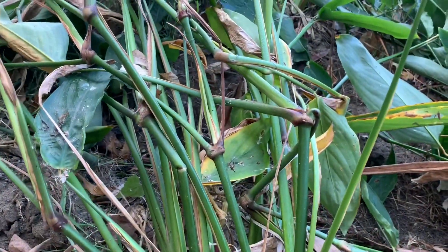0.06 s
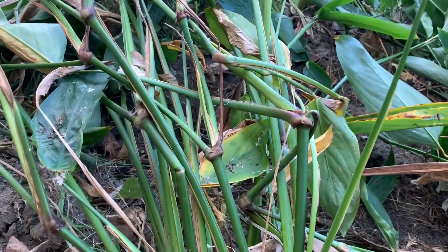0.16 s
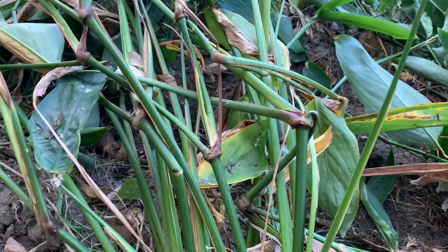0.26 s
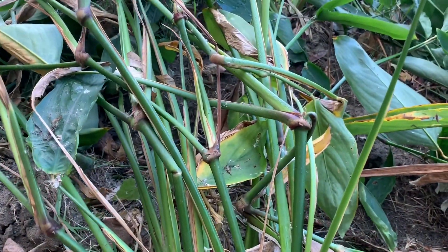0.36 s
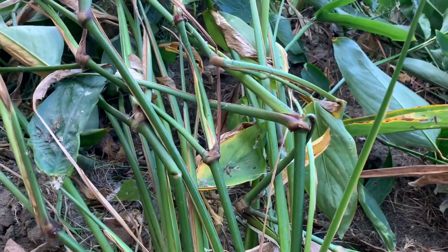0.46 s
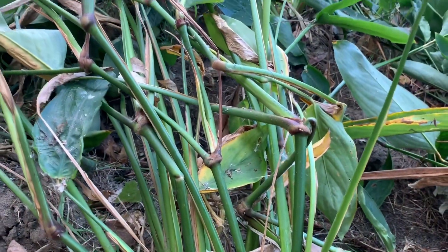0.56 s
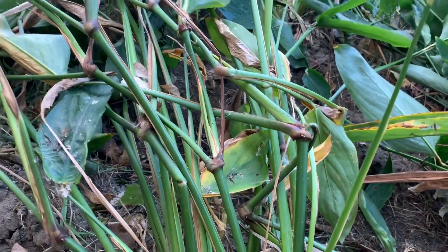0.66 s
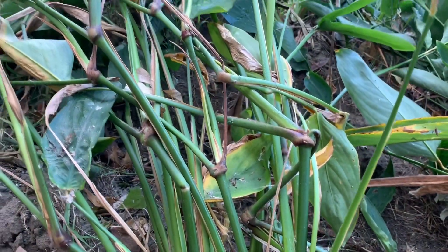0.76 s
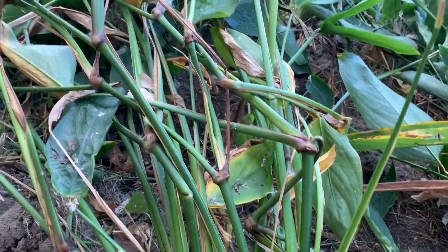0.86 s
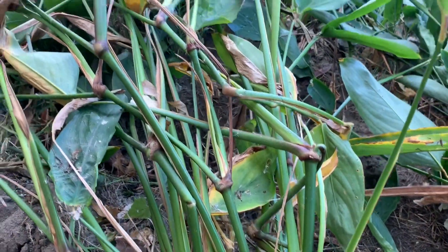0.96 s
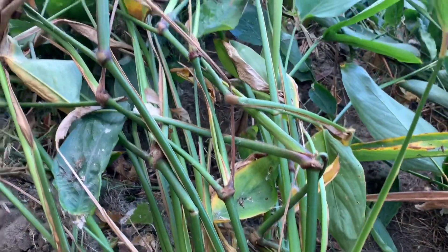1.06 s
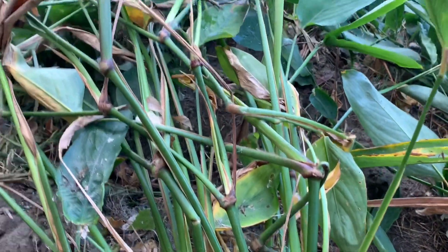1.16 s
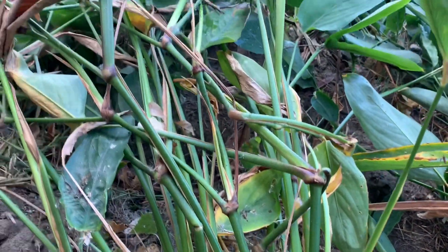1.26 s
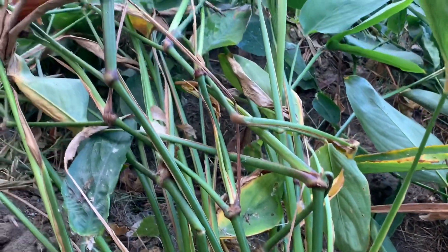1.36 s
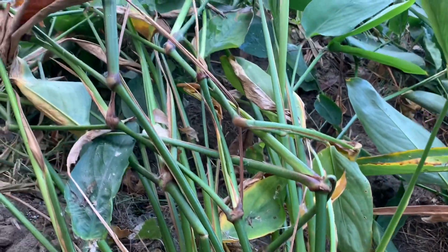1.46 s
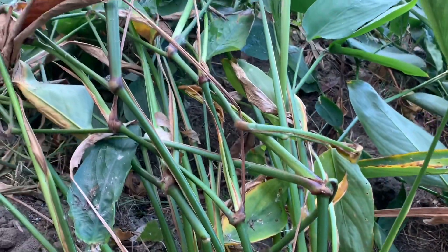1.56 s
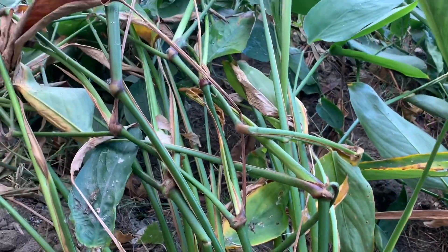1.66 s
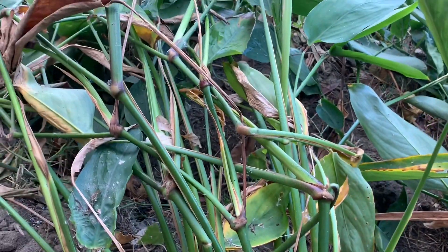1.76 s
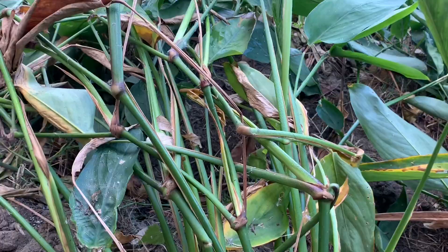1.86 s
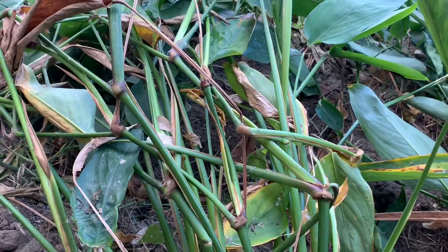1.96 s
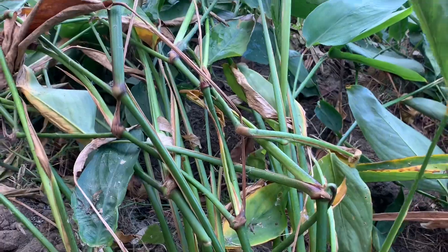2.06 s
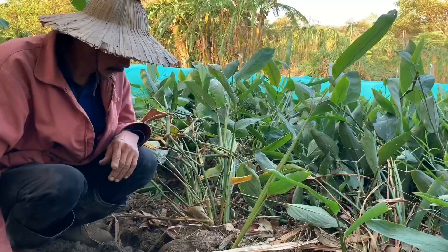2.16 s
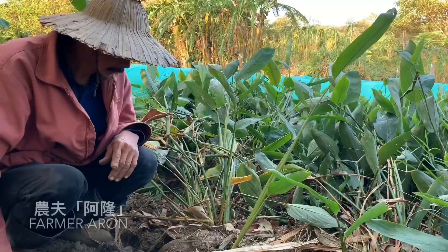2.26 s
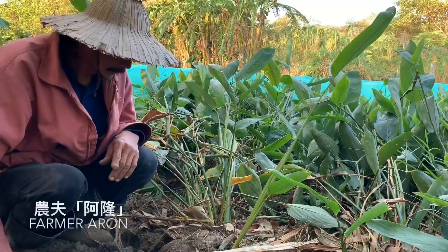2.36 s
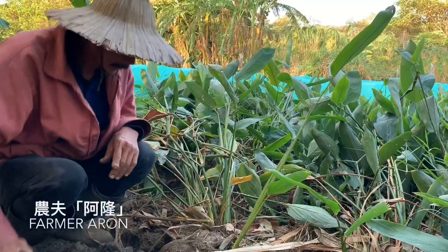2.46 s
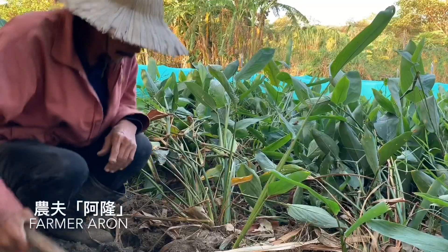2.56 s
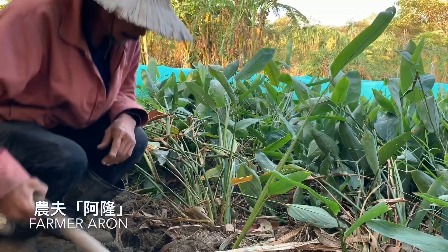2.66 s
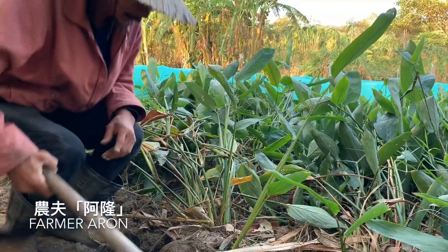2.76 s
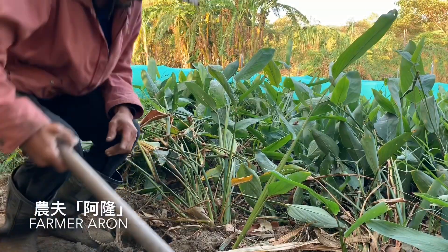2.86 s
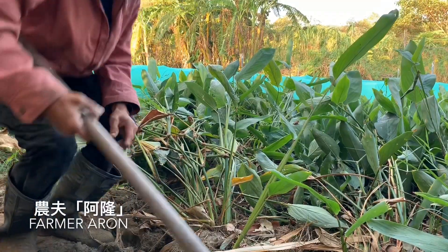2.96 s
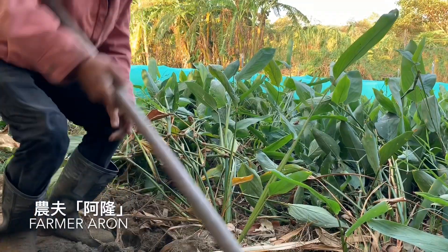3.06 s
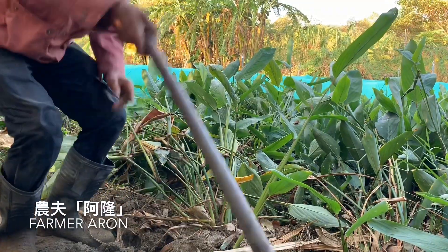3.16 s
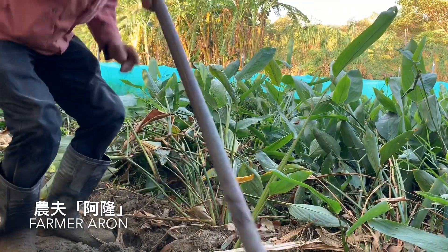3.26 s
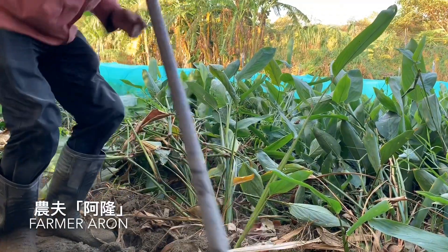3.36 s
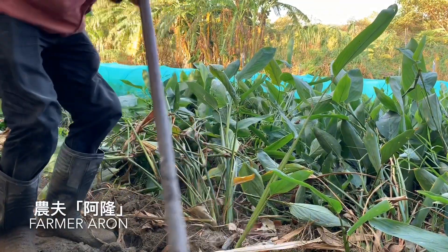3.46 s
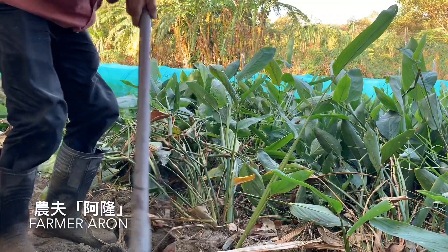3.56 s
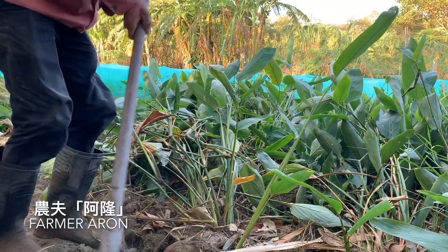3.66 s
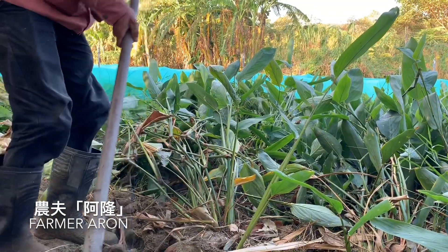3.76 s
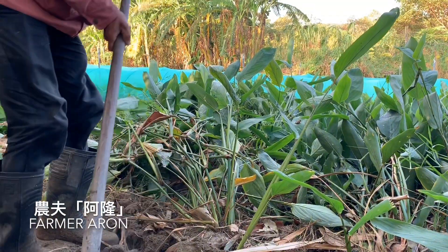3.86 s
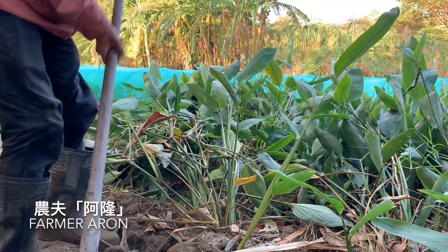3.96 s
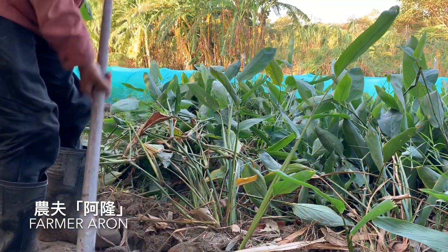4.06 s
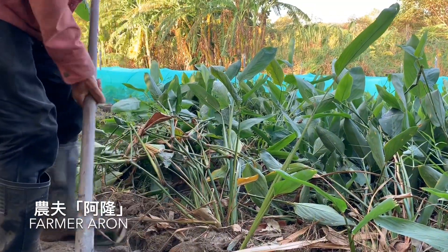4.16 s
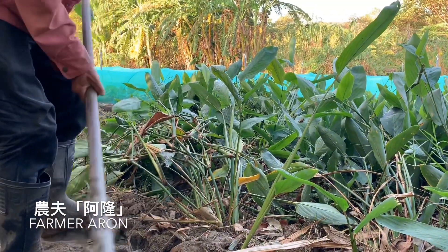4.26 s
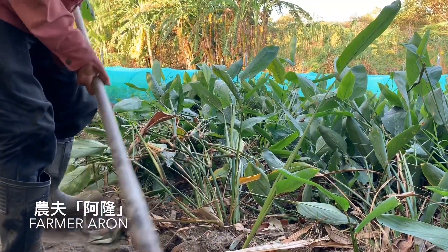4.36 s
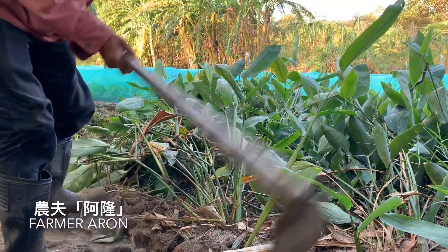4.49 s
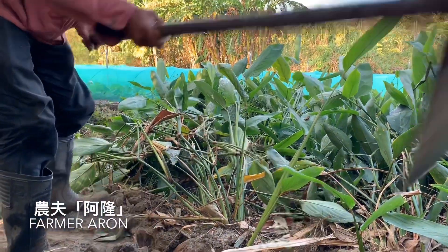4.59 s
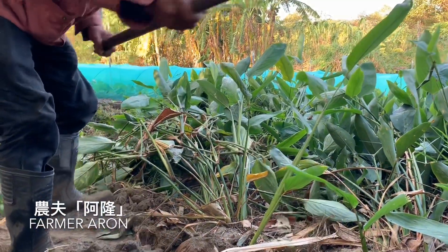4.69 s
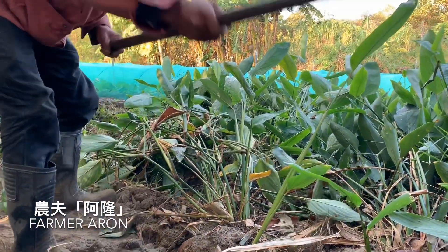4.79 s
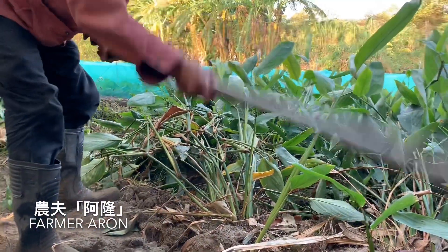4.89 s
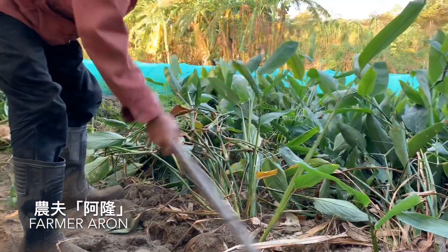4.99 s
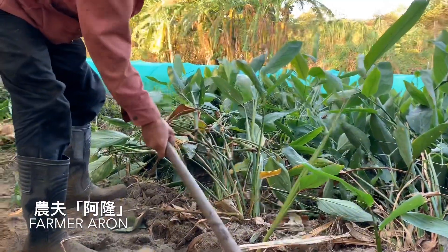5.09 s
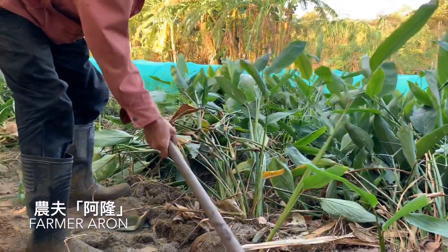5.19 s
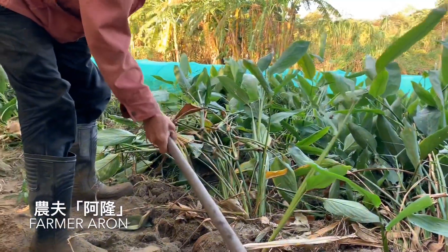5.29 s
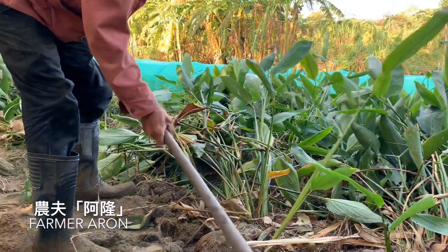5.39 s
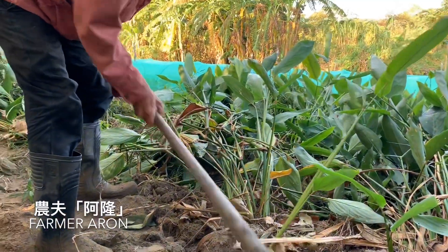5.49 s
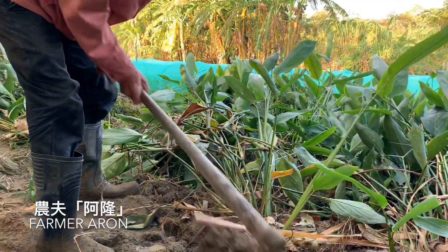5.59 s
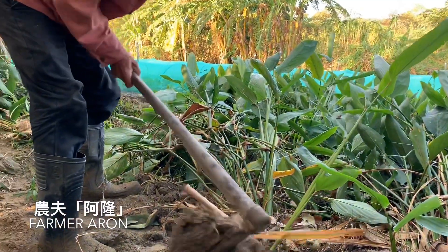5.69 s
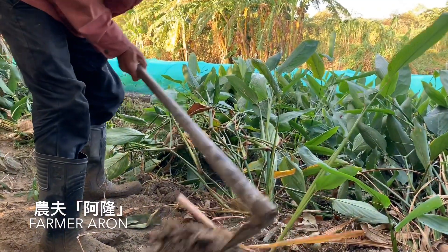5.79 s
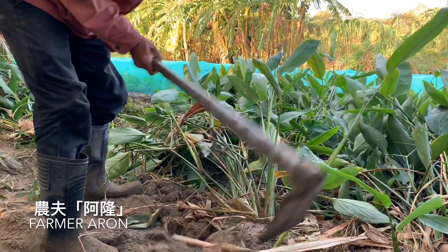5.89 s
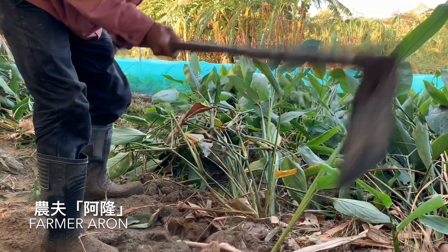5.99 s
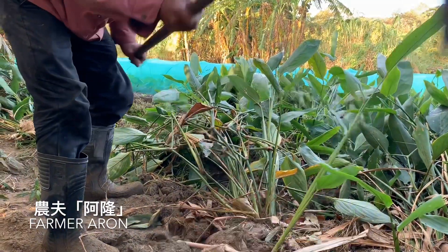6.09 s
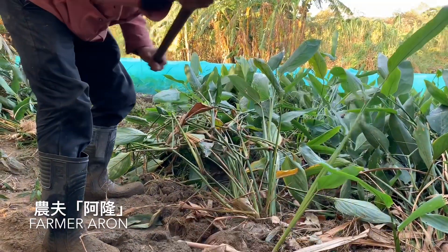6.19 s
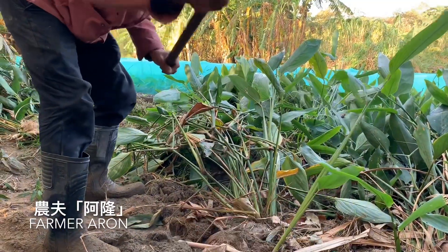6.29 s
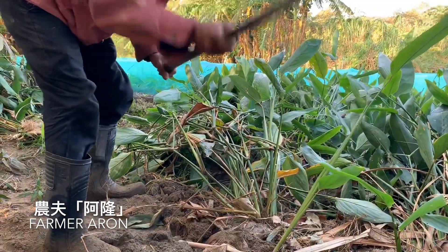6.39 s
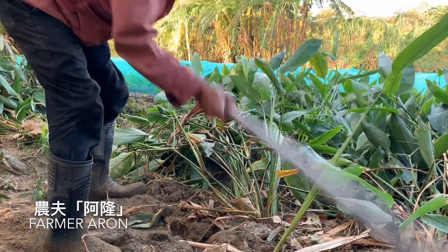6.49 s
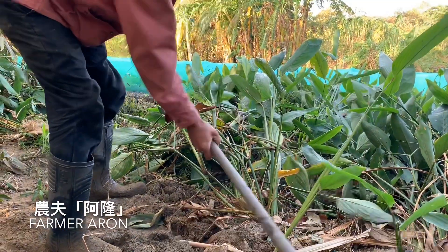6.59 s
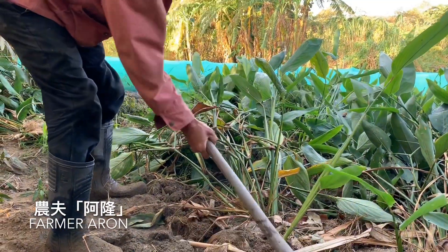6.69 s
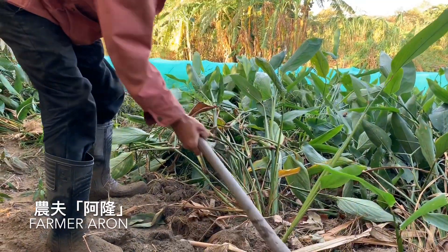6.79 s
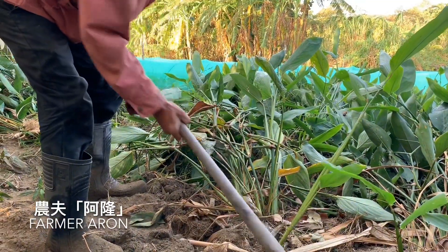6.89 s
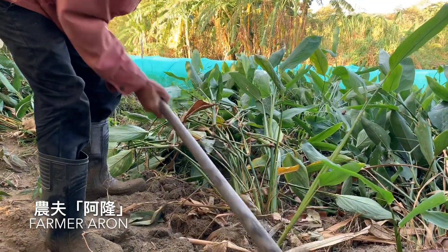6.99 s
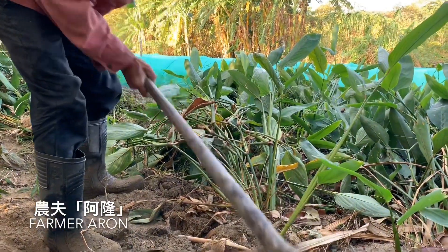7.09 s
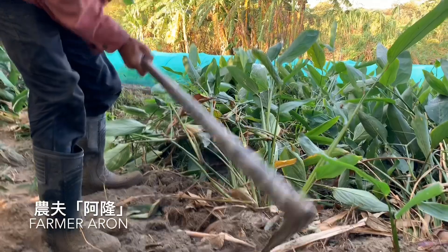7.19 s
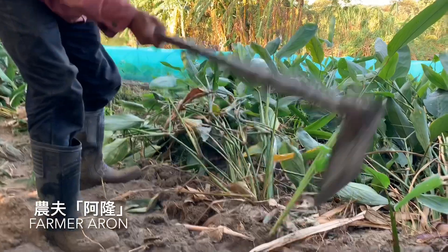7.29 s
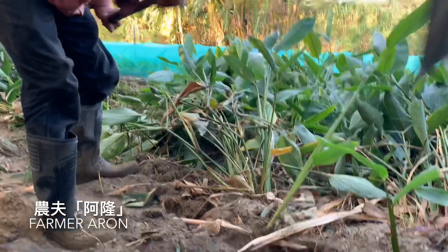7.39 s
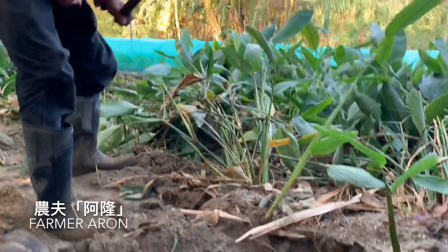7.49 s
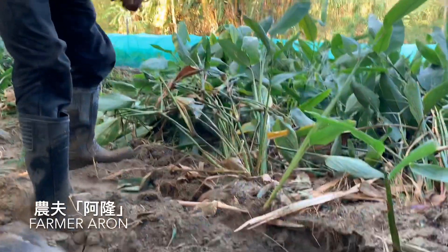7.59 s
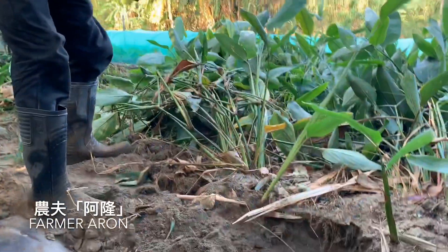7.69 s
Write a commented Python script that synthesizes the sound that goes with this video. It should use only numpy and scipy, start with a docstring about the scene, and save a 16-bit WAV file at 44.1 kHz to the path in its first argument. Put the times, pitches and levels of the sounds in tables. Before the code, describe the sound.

A hoe works dry ground very near a small stereo microphone outdoors. After two seconds of soft birdsong and faint rumble comes a first gritty chop, then scraping and a bright blade-on-stone clack. A duller, hollow second chop and a heavier third come later, with crackling litter and brittle snaps between them and crumbs raining at the end.

```python
"""A farmer's hoe chops into dry soil three times and once clacks on a stone: noise of fracture and damped modes.
Between blows the blade drags through earth and dead leaves (random grains), stalks snap and low knocks sound
(noise through a resonance), and soil rains back after the last blow. Birds call in gliding, raspy tones
from the trees, over rumble, air and far twitter of filtered noise. The leafy field returns echoes;
a phone close by hears through two ports that differ in phase and level."""
import sys
import numpy as np
from scipy import signal
from scipy.fft import rfft, irfft, next_fast_len
from scipy.io import wavfile
from scipy.ndimage import uniform_filter1d, map_coordinates

SR = 44100
rng = np.random.default_rng(int(sys.argv[2]) if len(sys.argv) > 2 else 0)


def dump(signal):
    """Clip the signal to [-1, 1] and save it as 16-bit WAV at the path in sys.argv[1]."""
    limited = np.clip(np.atleast_2d(signal).T, -1, 1)
    pcm = np.round(limited * 32767).astype(np.int16)
    wavfile.write(sys.argv[1], SR, pcm)


N = 341412
T = np.arange(N) / SR

# Signed halves, left then right, that share a left-right difference between the two sides.
SIDES = np.array([[.5], [-.5]])
# Modes of blade and handle. Each row: frequency in Hz, relative level in dB, t60 in seconds.
HOE_MODES = [(524, -40, 0.063), (797, -23.5, 0.033), (1180, -32.5, .06), (1237, -18.5, 0.044),
             (1363, -3, 0.0063), (1590, -9, 0.0294), (1650, -1, 0.0028), (1940, -25, 0.06),
             (2555, -16.5, 0.028), (2950, -30.5, 0.036), (4260, -17, 0.0063)]
# Modes of the ground giving under a blow. Each row: frequency in Hz, relative level in dB, t60 in seconds.
GROUND_MODES = [(50.8, 3, 0.32), (154, 2.5, 0.12)]


def amp(db):
    """Level law: decibels to an amplitude ratio."""
    return 10 ** (np.asarray(db) / 20)


def unit(x):
    """Power normalisation: scale to rms 1."""
    return x / np.sqrt(np.mean(x ** 2) + 1e-20)


def along(points, hz):
    """Logarithmic frequency scale: (Hz, value) points interpolated along it."""
    f, v = np.transpose(points)
    return np.interp(np.log(hz + 1), np.log(f + 1), v)


def wobble(rate):
    """Band-limited fluctuation: a smooth random curve with rate knots a second."""
    knots = rng.standard_normal(int(T[-1] * rate) + 4)
    return map_coordinates(knots, [T * rate], mode="nearest")


def filtered(x, response):
    """Linear filtering: the spectrum of x times a complex response of frequency."""
    size = x.shape[-1]
    padded = next_fast_len(size + 8192)
    hz = np.fft.rfftfreq(padded, 1 / SR)
    return irfft(rfft(x, padded) * response(hz), padded)[..., :size]


def coloured(x, spectrum):
    """Spectral shaping: x filtered by a curve in dB, at rms 1."""
    return unit(filtered(x, lambda hz: amp(along(spectrum, hz))))


def burst(s, rise, t60):
    """Exponential growth and decay: an envelope that swells up to time s and then dies away."""
    since = T - s
    return np.exp(np.minimum(since / rise, -np.log(1000) * since / t60).clip(-40, 0))


def add(track, s, sound):
    """Superposition: mix a short sound into the track at time s."""
    part = track[max(round(s * SR), 0):][:len(sound)]
    part += sound[:len(part)]


def grit(rate, spread_db):
    """Shot noise: tiny fractures at random moments, rate a second, of uneven size."""
    sizes = amp(spread_db * np.minimum(rng.exponential(size=N), 4)) * rng.choice([-1, 1], N)
    return unit(sizes * (rng.random(N) < rate / SR))


def crumbs(rate, hz, spread_db, size=64):
    """Granular synthesis: tiny fractures, each a cycle or two at its own pitch around the median hz."""
    draws = rng.standard_normal((int(rate * T[-1]), 2))
    starts, k = rng.integers(0, N - size, len(draws)), np.arange(size)
    pitches = np.minimum(hz * np.exp(.5 * draws[:, :1]), SR / 3)
    cycles = pitches * k / SR
    sizes = amp(spread_db * np.minimum(draws[:, 1:], 2))
    grains = sizes * np.sin(2 * np.pi * cycles) * np.exp(-cycles)
    return unit(np.bincount((starts[:, None] + k).ravel(), grains.ravel(), N))


def patchy(x, depth_db):
    """Time-varying spectrum: the colour of a rustle shifts as different leaves and crumbs take part."""
    z = signal.stft(x, nperseg=512)[2]
    field = rng.standard_normal(z.shape)
    for axis in (0, 1):
        field = uniform_filter1d(field, size=5, axis=axis)
    shifted = z * amp(depth_db * unit(field))
    return unit(signal.istft(shifted, nperseg=512)[1][:N])


def ringing(modes, attack):
    """Modal synthesis: damped sinusoids after one contact, softened by its attack time."""
    t = np.arange(SR // 4) / SR
    partials = sum(amp(db - 60 * t / t60) * np.sin(2 * np.pi * hz * t) for hz, db, t60 in modes)
    return partials * (1 - np.exp(-t / attack))


def cracks(rows, sharpness):
    """Resonant filtering: each event is a short burst of noise through one resonance of Q = sharpness."""
    out, t = np.zeros(N), np.arange(SR // 8) / SR
    for s, db, hz, t60 in rows:
        push = rng.standard_normal(len(t)) * amp(-60 * t / t60)
        body = filtered(push, lambda f: 1j * f * hz / (sharpness * (hz * hz - f * f) + 1j * f * hz))
        add(out, s, amp(db) * body / np.abs(body).max())
    return out


def diffuse(spectrum):
    """Diffuse field: stereo noise of rms 1 whose left-right coherence depends on frequency."""
    # Each row: frequency in Hz, correlation of left and right from -1 to 1.
    likeness = [(60, 1), (150, 0.71), (380, 0.25), (950, -0.31), (2400, -0.63), (6000, 0.91)]

    def mid_side(hz):
        turn = np.arccos(np.clip(along(likeness, hz), -1, 1)) / 2
        return amp(along(spectrum, hz)) * [np.cos(turn), np.sin(turn)]

    mid, side = filtered(rng.standard_normal((2, N)), mid_side)
    return unit(np.array([mid + side, mid - side]))


def scattered(x, t60, onset):
    """Multiple scattering: convolution with a decaying random tail for each side, scaled to energy 1 on the left."""
    t = np.arange(SR // 2) / SR
    tail = rng.standard_normal((2, len(t))) * amp(-60 * t / t60) * (1 - np.exp(-t / onset))
    return signal.fftconvolve(x[None], tail / np.linalg.norm(tail[0]), axes=1)[:, :N]


def outdoors():
    """Ambient noise: low rumble, faint air and the high twitter of many far birds and insects."""
    # Noise spectra; the rumble is also cut below 32 Hz. Each row: frequency in Hz, relative level in dB.
    rumble_spectrum = [(12, -46.5), (20, -6.5), (43, 2), (70, -1.5), (100, -4.5), (190, -13), (333, -23),
                       (403, -27.5), (497, -28), (562, -28), (870, -29.5), (1300, -42.5), (1690, -46.5),
                       (2860, -120)]
    air_spectrum = [(200, -22), (700, -4.5), (1000, 0), (1300, -14), (3000, -8), (4800, -15), (5300, -25.5),
                    (16000, -23.5)]
    chorus_spectrum = [(2500, -38.5), (3500, -5.5), (4100, 1.5), (5000, 13), (5300, -33), (7000, -90)]
    # The far chorus steps up in level shortly after two seconds. Each row: time in seconds, gain in dB.
    chorus_step = [(2.0, -2.5), (2.3, 1.5)]
    low = filtered(diffuse(rumble_spectrum), lambda hz: hz ** 3 / np.hypot(hz ** 3, 32 ** 3))
    rumble = amp(-37 + 2.5 * wobble(5.9) + np.interp(T, [2.1, 2.4], [-1, .7])) * low
    air = amp(-61) * diffuse(air_spectrum)
    flicker_db = 3.5 * wobble(9)
    chorus = amp(-61.5 + flicker_db) * diffuse(chorus_spectrum)
    # the nearest singers: a fuzzy band that drifts in pitch as they take turns
    twitter_hz, drift_hz, turns_per_s = 4330, 150, 7.6
    fuzz = unit(filtered(rng.standard_normal((2, N)), lambda hz: np.exp(-(hz / 370) ** 2)))
    pitch_hz = twitter_hz + drift_hz * wobble(turns_per_s)
    singers = fuzz * np.sin(2 * np.pi * np.cumsum(pitch_hz) / SR)
    singers_gain = amp(-55.5 + 3.07 * wobble(5.1))
    step = amp(np.interp(T, *np.transpose(chorus_step)))
    return rumble + air + step * (chorus + singers_gain * singers)


def syllables():
    """Pitch contours: every bird note as (start s, length s, start Hz, end Hz, rasp Hz, dB)."""
    # Runs of quick falling chips. Each row: start in seconds, first pitch in Hz, level in dB, number of chips.
    chatter = [(0.499, 3120, -42.5, 1), (1, 3190, -34.5, 3), (1.614, 3340, -33, 2)]
    # Raspy falling notes. Each row: start in seconds, length in seconds, start pitch in Hz, level in dB.
    buzz_notes = [(0.035, .07, 4360, -43), (0.058, 0.079, 3780, -40.5), (0.74, .1, 2150, -48.5),
                  (1.09, .05, 2850, -38.5), (1.171, 0.076, 3750, -47.5), (1.661, 0.083, 2900, -37),
                  (6.202, .11, 3740, -50)]
    # Clear whistles. Each row: start in seconds, length in seconds, start and end pitch in Hz, level in dB.
    whistle_notes = [(1.386, .08, 1490, 1360, -46.5), (1.475, .05, 1790, 1940, -45),
                     (3.998, .047, 2720, 2744, -48.5), (6.849, .026, 3150, 3400, -46),
                     (7.039, 0.085, 3040, 3240, -47)]
    chip_s, chip_gap_s, chip_rasp_hz = .0125, .034, 30  # the gap runs from start to start
    chip_fall, chip_step = 0.78, .92  # end pitch over start pitch; next chip over this one
    buzz_fall, rasp_share = .83, 0.068  # end pitch over start pitch; flutter as a share of the start pitch
    whistle_rasp_hz = 38
    notes = []
    for s, first_hz, db, count in chatter:
        for k in range(round(count)):
            hz = first_hz * chip_step ** k
            notes.append((s + k * chip_gap_s, chip_s, hz, hz * chip_fall, chip_rasp_hz, db))
    for s, length, hz, db in buzz_notes:
        notes.append((s, length, hz, hz * buzz_fall, hz * rasp_share, db))
    for s, length, start_hz, end_hz, db in whistle_notes:
        notes.append((s, length, start_hz, end_hz, whistle_rasp_hz, db))
    return notes


def birds():
    """Frequency modulation: syllables slide in pitch with a random rasp, and smear among the trees."""
    out, flutter = np.zeros(N), wobble(900)
    for s, length, start_hz, end_hz, rasp_hz, db in syllables():
        u = np.linspace(0, 1, int(length * SR))
        glide = end_hz + (start_hz - end_hz) * (1 - u) ** 1.346
        hz = glide + rasp_hz * flutter[int(s * SR):][:len(u)]
        swell = np.abs(np.sin(np.pi * u))
        add(out, s, amp(db) * swell * np.sin(2 * np.pi * np.cumsum(hz) / SR))
    return out + amp(0.5) * scattered(out, t60=0.31, onset=0.002)


def chops():
    """Fracture and impact: the edge shears the crust, jams in firm earth, and the ground thuds as soil spills."""
    # Hoe blows. Each row: entry in seconds, relative entry level in dB, seconds until the blade stops,
    # relative stop level in dB, relative thud level in dB, rise in seconds, t60 of the spilling soil in seconds.
    blow_rows = [(2.2272, -19.5, 0.0102, -15.5, -30.5, 0.0009, 0.088),
                 (5.049, -14.5, 0.0044, -16, -27.5, 0.0029, 0.15),
                 (6.5963, -13, 0.01007, -10, -20, 0.00083, 0.12)]
    # Spectra of shearing, jamming and thud. Each row: frequency in Hz, relative level in dB.
    cut_spectrum = [(100, -14.5), (600, -6), (2000, 2.5), (4200, 5), (6000, -2), (8000, -1.5),
                    (12000, -1.5), (16000, -4.5)]
    stop_spectrum = [(60, -16), (200, 2), (380, 0.5), (800, 0), (1600, 0.5), (3000, -9.5), (5000, -13),
                     (8000, -4.5), (16000, -14)]
    thud_spectrum = [(20, -4), (50, -1.5), (110, 3), (180, -1), (300, -6.5), (700, -60.5)]
    shear = coloured(grit(20000, spread_db=3.0), cut_spectrum)
    crush = coloured(grit(12000, spread_db=-1), stop_spectrum)
    tremor = coloured(rng.standard_normal(N), thud_spectrum)
    cutting, jamming, thudding, push = np.zeros((4, N))
    for s, entry_db, travel, stop_db, thud_db, rise, t60 in blow_rows:
        stop = s + travel
        brushing = amp(-10.5) * burst(s, 0.006, 0.025)  # leaves graze the falling blade
        spilling = 0.62 * burst(stop, 0.0008, t60)
        cutting += amp(entry_db) * (brushing + burst(s, rise, 0.021) + spilling)
        jamming += amp(stop_db) * (0.53 * burst(stop, 0.0037, t60) + 0.77 * burst(stop, 0.0046, 0.019))
        thudding += amp(thud_db - 2) * burst(stop + 0.012, 0.0085, 0.16)
        add(push, stop, amp(thud_db + 1) * ringing(GROUND_MODES, attack=0.0034))
    force = jamming * crush + cutting * shear
    ring = ringing(HOE_MODES, attack=0.003)
    blade = signal.fftconvolve(force, ring / np.linalg.norm(ring))[:N]
    return force + amp(-28) * blade + thudding * tremor + push


def stroke(s, length, swell_db):
    """Exponential envelope: a stroke takes hold, changes steadily by swell_db as the blade moves, and settles."""
    bite_db_per_s, settle_db_per_s = 261, 179  # taking hold; litter coming to rest
    progress = np.clip((T - s) / length, 0, 1)
    outside_db = bite_db_per_s * np.maximum(s - T, 0) + settle_db_per_s * np.maximum(T - s - length, 0)
    return amp(swell_db * (progress - .5) - outside_db)


def dragging():
    """Granular friction: crumbs grind under the blade and dead leaves crackle, in small fits."""
    # Blade or boot scraping through earth and litter. Each row: start in seconds, length in seconds,
    # relative earth level in dB, relative dry-leaf level in dB, level change over the stroke in dB.
    stroke_rows = [(2.492, 0.02, -53, -68, -7), (2.557, 0.55, -63.5, -70, -7),
                   (3.171, 0.29, -43, -36.5, 3.5), (3.557, .21, -41.5, -39, -6.5),
                   (4.019, 0.16, -54, -50, 0), (4.272, 0.25, -52.5, -47.5, -0.5),
                   (4.737, 0.22, -59, -78, -5.5), (5.164, 0.064, -53, -40.5, 11),
                   (5.508, 0.46, -47.5, -41, 7), (6.02, 0.079, -67, -48.5, 2.5), (6.254, .05, -65, -62, 1),
                   (6.632, 0.69, -54, -52, -11), (7.119, 0.063, -47, -38.5, 3.5),
                   (7.314, 0.053, -48, -36, 0), (7.419, 0.22, -57.5, -55.5, -15)]
    # Spectra of the two materials' grit. Each row: frequency in Hz, relative level in dB.
    earth_spectrum = [(60, -16.5), (250, 6), (600, 4), (1600, 4.5), (3500, 0.5), (6000, 2.5), (10000, -59),
                      (16000, -37)]
    leaf_spectrum = [(500, -33), (2000, -18), (4000, 2), (6000, -3.5), (9000, 5.5), (12000, 1),
                     (16000, -0.5)]
    # between strokes the farmer keeps shifting on the soil
    work_start_s, work_end_s = 2.45, 8.9
    working = stroke(work_start_s, work_end_s - work_start_s, swell_db=-6)
    on_earth, on_leaves = amp(-63) * working, amp(-73) * working
    for s, length, earth_db, leaves_db, swell_db in stroke_rows:
        effort = stroke(s, length, swell_db)
        on_earth = np.hypot(on_earth, amp(earth_db) * effort)  # powers add
        on_leaves = np.hypot(on_leaves, amp(leaves_db) * effort)
    fits_db = 0.79 * wobble(30) + 1.0 * wobble(130)
    earth = coloured(grit(3000, spread_db=1), earth_spectrum)
    earth = earth + amp(-7.0) * crumbs(rate=600, hz=2312, spread_db=1.5)
    leaves = coloured(grit(5000, spread_db=2.0), leaf_spectrum)
    leaves = leaves + amp(-7.0) * crumbs(rate=400, hz=6140, spread_db=2)
    return amp(fits_db) * (on_earth * patchy(earth, depth_db=2.0) + on_leaves * patchy(leaves, depth_db=3.5))


def snaps():
    """Brittle fracture: dry stalks snap as very short noise in a broad resonance."""
    # Each row: start in seconds, peak level in dB, pitch in Hz.
    snap_rows = [(2.7055, -27, 4800), (4.737, -31, 5870), (5.1729, -11, 4870), (5.2, -12, 3950),
                 (5.642, -22, 7000), (6.0068, -17, 5200), (7.004, -31, 7930), (7.1324, -20, 2810),
                 (7.3322, -14, 3640)]
    t60_s = .005
    return cracks([(*snap, t60_s) for snap in snap_rows], sharpness=1.2)


def knocks():
    """Impact resonance: low knocks as noise in a narrower, lower resonance."""
    # Low knocks: dropping clods, and the hollow knock of the second chop at 5.053.
    # Each row: start in seconds, peak level in dB, pitch in Hz, t60 of the noise in seconds.
    knock_rows = [(2.706, -29.5, 1010, .13), (2.7415, -30, 1140, 0.11), (5.053, -15, 490, .085),
                  (5.2, -26.5, 1510, 0.048), (5.945, -33, 700, .04), (6.7825, -22.5, 570, 0.024),
                  (6.801, -20, 500, 0.027), (6.832, -35, 1410, .035), (6.842, -23.5, 467, .05)]
    return cracks(knock_rows, sharpness=3)


def clack():
    """Impact of stiff bodies: steel meets stone and rebounds a few times; the stone nudges the ground."""
    # The blade chatters on a stone. Each row: contact in seconds, relative level in dB.
    contacts = [(3.5626, -19.5), (3.567, 6), (3.57, -10), (3.5759, -14.5), (3.5812, -11.5)]
    out, ring = np.zeros(N), ringing(HOE_MODES, attack=0.00048)
    nudge = ringing(GROUND_MODES, attack=0.003)
    for s, db in contacts:
        add(out, s, amp(db + 1.5) * ring + amp(db - 35) * nudge)
    return out


def patter():
    """Random impacts: soil thrown up by the last blow rains back as dull lumps and finer crumbs."""
    lumps = amp(-38.0) * burst(6.78, 0.018, 0.97) * crumbs(rate=120, hz=557, spread_db=3.5, size=400)
    fines = amp(-42) * burst(6.8, 0.03, 0.54) * crumbs(rate=450, hz=2000, spread_db=-1, size=128)
    return lumps + fines


def scene():
    """Superposition: the work close by, its reflection from the plants, and the field around it."""
    # The blows land off to the right. Each row: frequency in Hz, phase in radians by which left leads.
    blow_phase = [(700, -0.5), (1500, -0.004), (3000, -1.6), (4200, -0.012)]
    # What the plants reflect. Each row: frequency in Hz, gain in dB.
    foliage = [(500, -5.5), (1500, 3), (3000, 4.5), (6000, 0.5), (8000, -24.5)]
    blows = filtered(chops(), lambda hz: np.exp(1j * SIDES * along(blow_phase, hz)))
    stone = clack()
    litter = dragging() + patter() + snaps() + knocks()
    # crumbs and leaves lie spread over the ground, so the two sides hear partly different ones
    width = SIDES * amp(-7) * dragging()
    # the clack is sent more weakly into the echoes
    towards_plants = blows.mean(0) + litter + amp(-5) * stone
    reflected = filtered(towards_plants, lambda hz: amp(along(foliage, hz)))
    echoes = amp(-5.0) * scattered(reflected, t60=0.037, onset=0.0014)
    return blows + stone + litter + width + echoes + birds() + outdoors()


def record(dry):
    """Two-port reception: phase and level differ by side, peaks clip at full scale, a steep low-pass follows."""
    # Each row: frequency in Hz, phase in radians by which left leads.
    port_phase = [(4100, 0), (5600, 2.6), (6400, 1.8), (7400, 0), (8200, 0), (8800, -1.5), (9250, -3.1),
                  (10200, -3.2), (10850, -5), (11050, -6.3), (12300, -6.3), (12650, -8), (13250, -9.4),
                  (14000, -9.5), (14400, -10.6), (14600, -12.6)]
    # Each row: frequency in Hz, left minus right level in dB.
    port_balance = [(40, -3.7), (140, -4.5), (300, 0), (1800, 0.5), (4000, -0.2), (5700, -2.5), (7000, 0)]
    top_hz = 15800

    def ports(hz):
        return amp(SIDES * along(port_balance, hz)) * np.exp(1j * SIDES * along(port_phase, hz))

    clipped = np.clip(filtered(dry, ports), -1, 1)
    return filtered(clipped, lambda hz: 1 / (1 + (hz / top_hz) ** 200))


dry = scene()
out = record(dry)
dump(out)
```